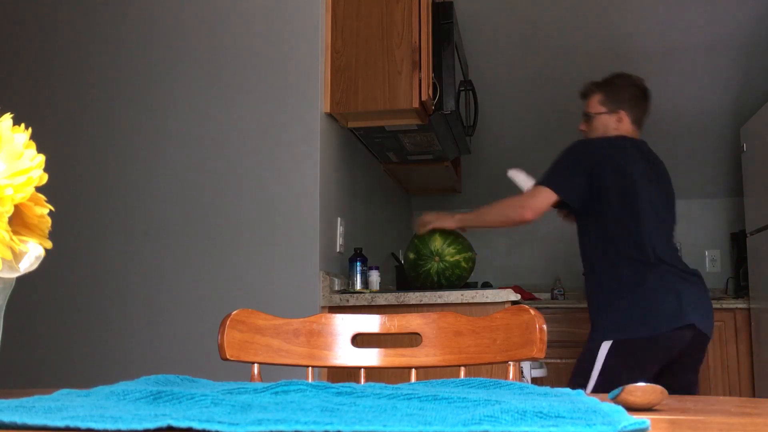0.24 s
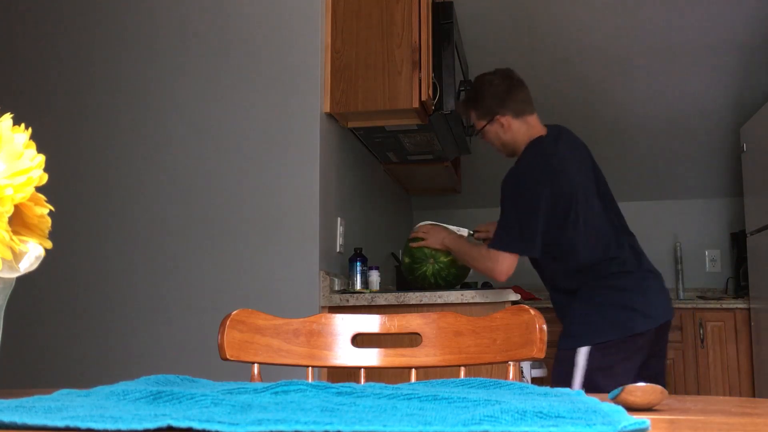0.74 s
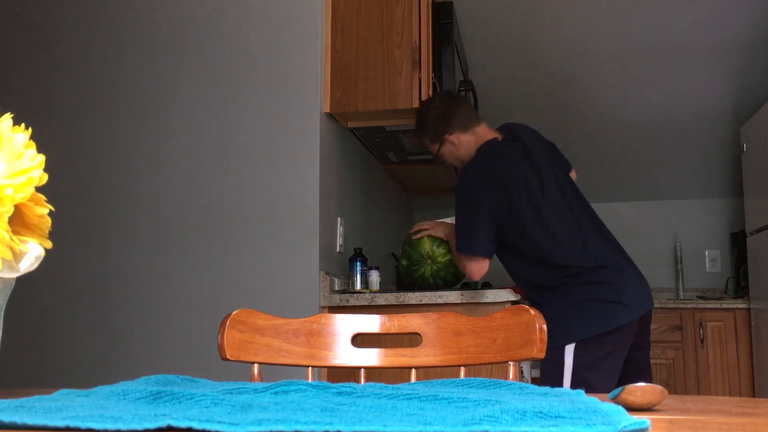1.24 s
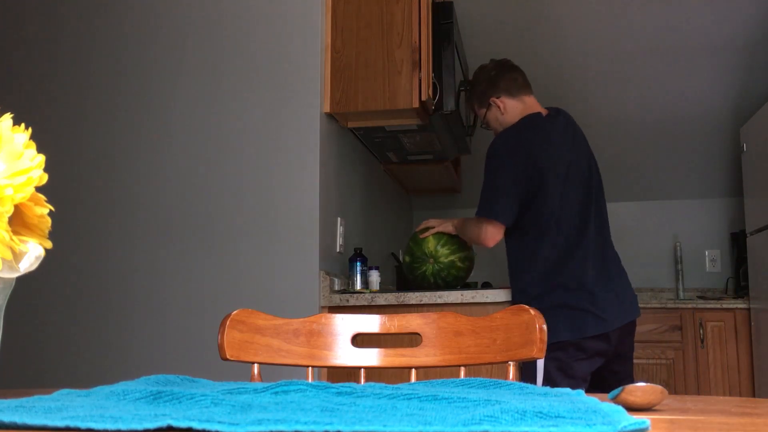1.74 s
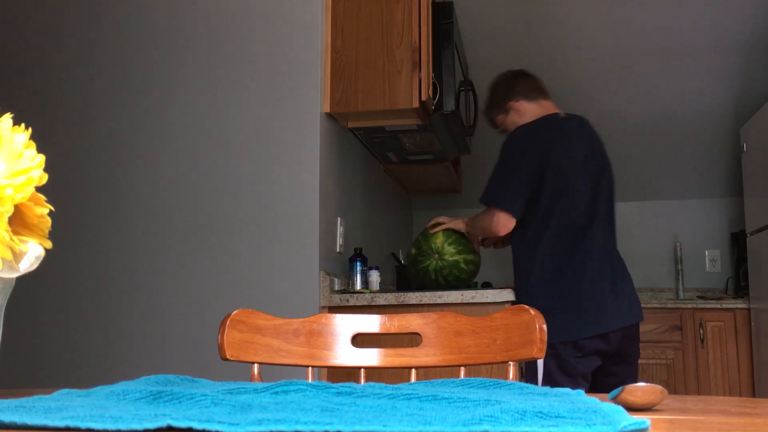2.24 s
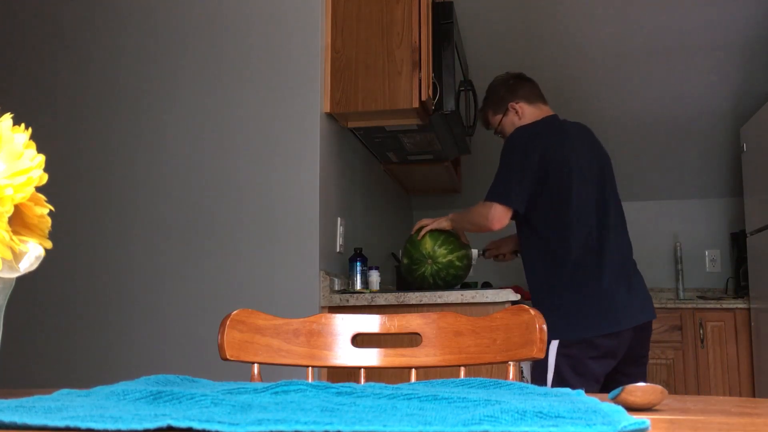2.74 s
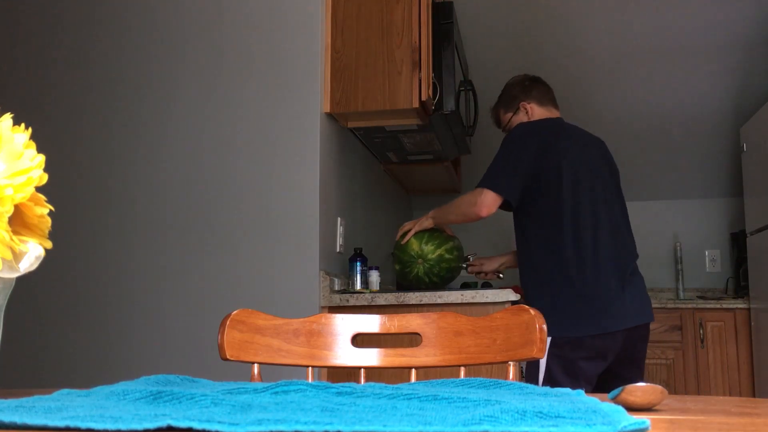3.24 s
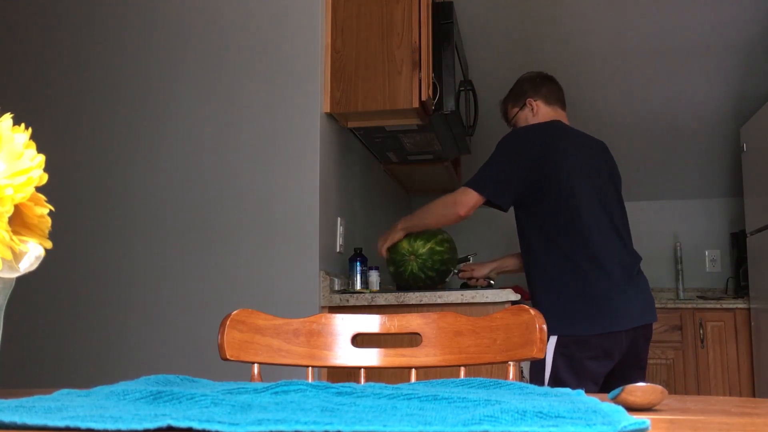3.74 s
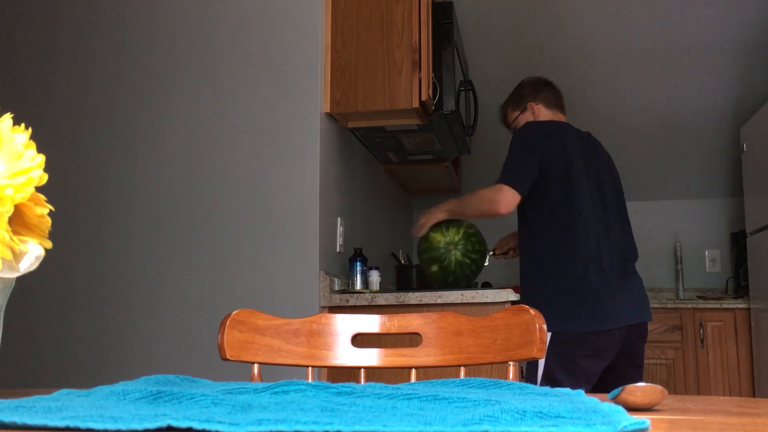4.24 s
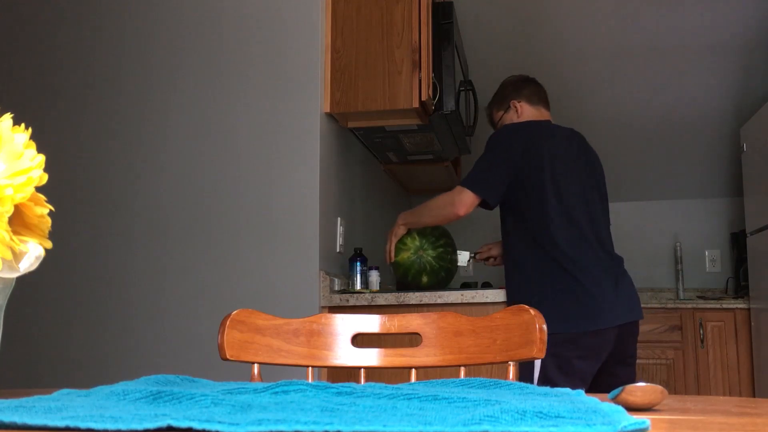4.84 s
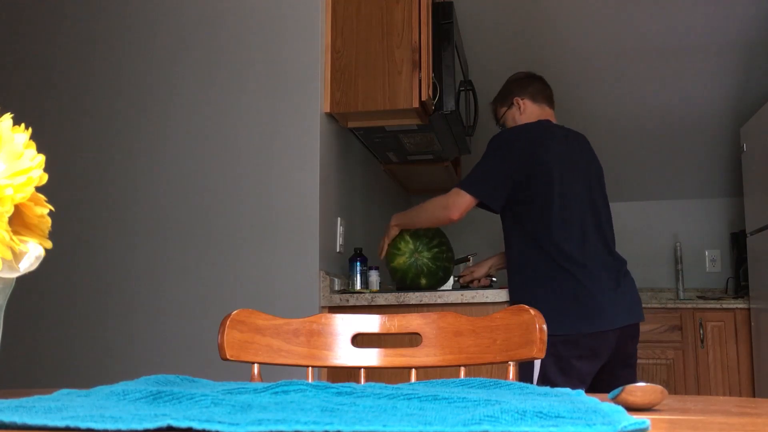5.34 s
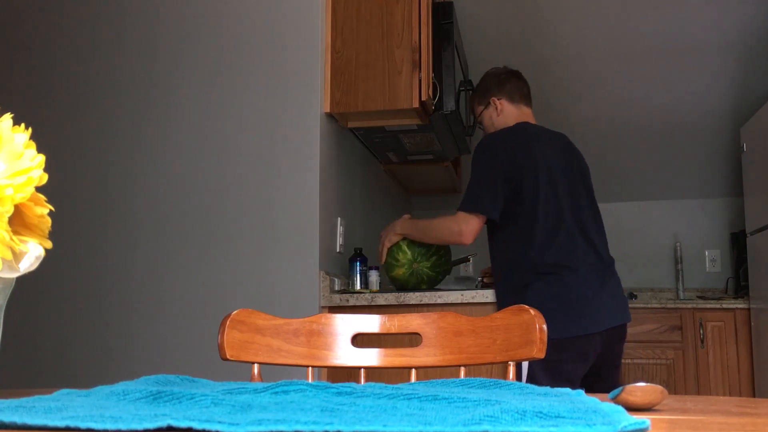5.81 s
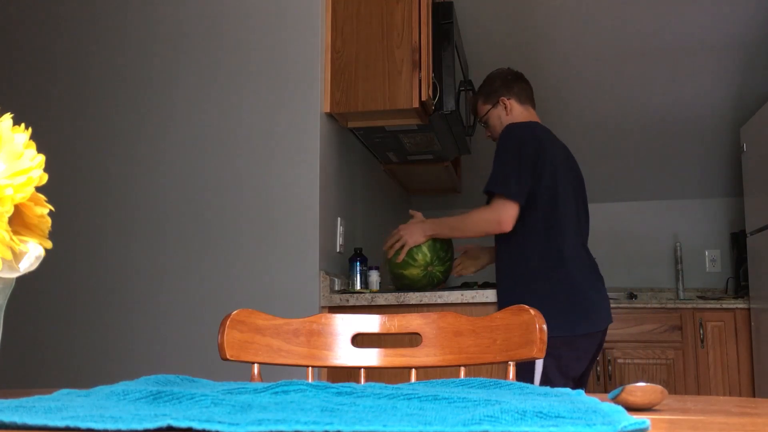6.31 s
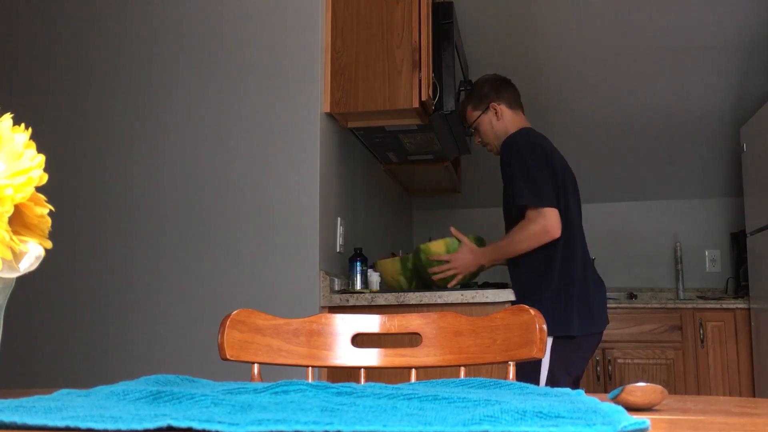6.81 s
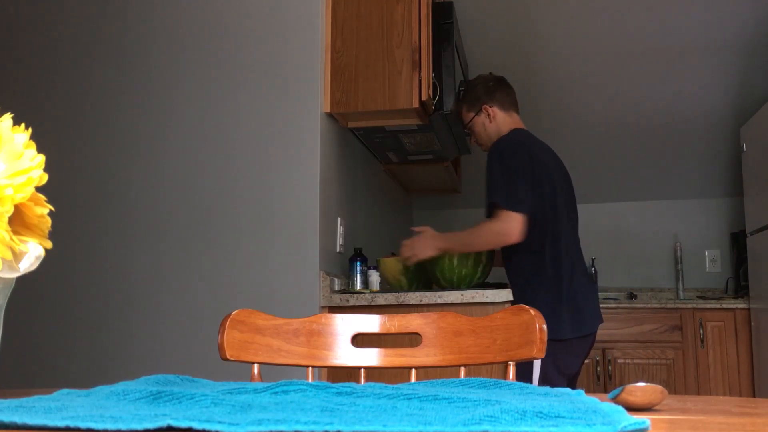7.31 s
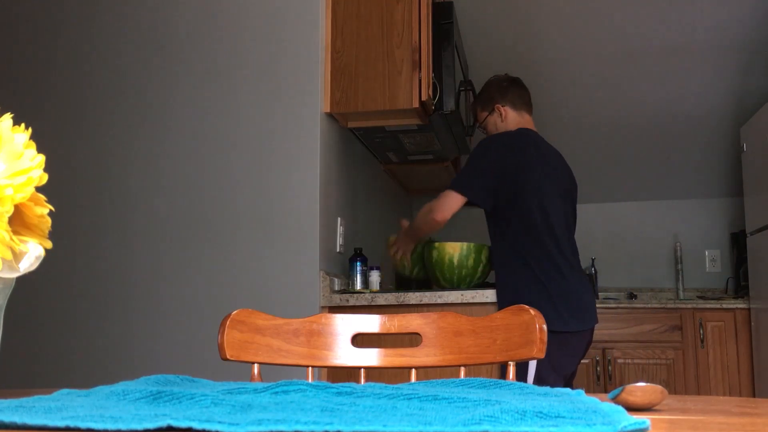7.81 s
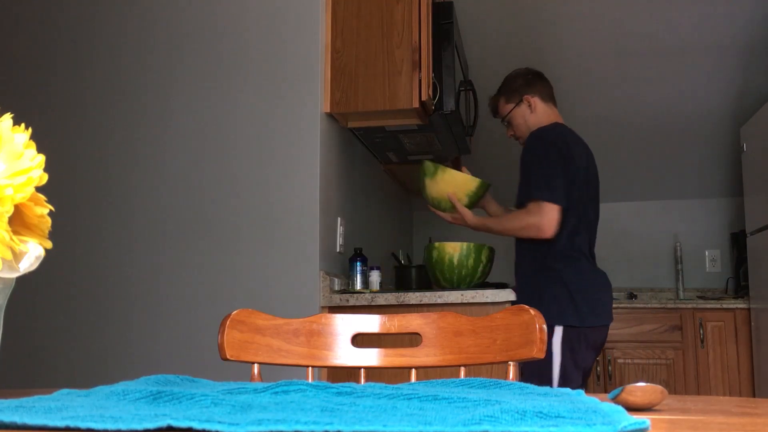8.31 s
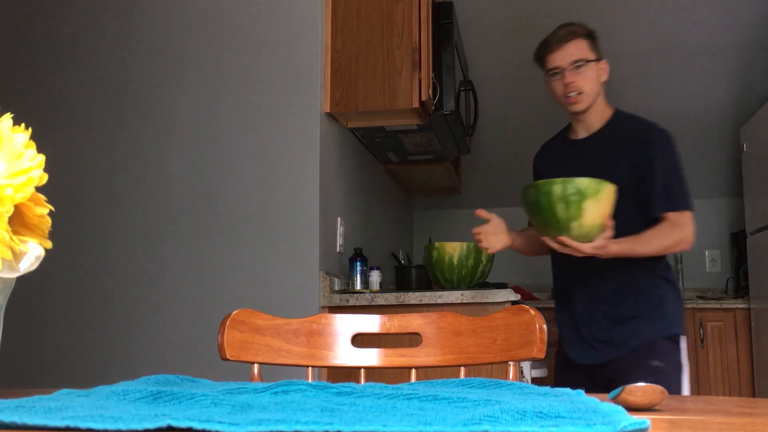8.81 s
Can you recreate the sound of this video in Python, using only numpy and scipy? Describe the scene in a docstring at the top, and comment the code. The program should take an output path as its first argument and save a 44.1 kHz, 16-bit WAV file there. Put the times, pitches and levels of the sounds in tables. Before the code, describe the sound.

Heard from across a bare, echoing kitchen, a watermelon takes a few hard knife chops that ring its hollow body. Soft rasping and fizzing follow as the blade works around the rind, with faint low thumps. Then the melon splits in a run of loud cracks, wet snapping fibres and a short steel ring. The halves are shifted and set down with scrapes and a knock, over a low, steady fridge hum.

```python
"""A watermelon scuffs on a board over a humming fridge; a big knife chops into it and saws round it.
The rind cracks and rings the hollow body, wet cells fizz, and the steel blade ticks and rings.
Snapping fibres tear the fruit open with a wet crunch, then the halves are set down on the counter.
The work is a few metres away and arrives mostly through the bare kitchen's echo."""
import sys
import numpy as np
from scipy import signal
from scipy.fft import rfft, irfft
from scipy.io import wavfile

SR = 44100
rng = np.random.default_rng(int(sys.argv[2]) if len(sys.argv) > 2 else 0)


def generate_wav(sig):
    """Save sig (samples, or channels by samples) to the path in sys.argv[1] as 16-bit PCM at SR."""
    pcm = np.round(np.clip(np.atleast_2d(sig).T, -1, 1) * 32767).astype(np.int16)
    wavfile.write(sys.argv[1], SR, pcm)


N = 399457
FILTER_HZ = np.maximum(np.fft.rfftfreq(4096, 1 / SR), 1)

# blows and single cracks: t/s, rind f/Hz, rind level/dB, hollow level/dB, brightness/dB
BLOWS = [(.064, 1000, 10, 8.5, 1), (.235, 890, 5.5, 8.5, 3.5), (.635, 1520, 9, 11.5, 2.5),
         (2.323, 880, -6, -2, -4.5), (5.210, 1295, 16, 9.5, -6), (5.643, 1255, 11.5, 7.5, -9),
         (5.671, 744, 16.5, 5, -15.5), (5.807, 1870, 14.5, 2.5, -4.5), (5.888, 674, 17, 13.5, -5),
         (6.036, 2280, 10.5, 5, 6), (6.735, 1420, -9, -1.5, -7.5), (7.784, 760, 4.5, 8, -25)]
# spectra of the hollow body, crisp cells and juice: f/Hz, gain/dB
HOLLOW_SPECTRUM = [(30, -19.5), (130, -0.5), (220, -7), (340, 0.5), (480, -5), (700, -0.5), (1100, -19.5),
                   (3000, -42), (16000, -79)]
CRISP_SPECTRUM = [(100, -66.5), (700, -48.5), (2200, 1), (2900, -3.5), (3600, -2), (5000, -7.5),
                  (6500, -10), (8000, -36), (16000, -40.5)]
JUICE_SPECTRUM = [(300, -65), (2000, -34), (6000, -0.5), (9300, 1), (10500, -7.5), (14000, -11.5),
                  (16000, -14)]


def undb(db):
    """Decibels to gain."""
    return 10 ** (np.asarray(db) / 20)


def unit_rms(x):
    """Scale to rms 1."""
    return x / np.sqrt(np.mean(x ** 2) + 1e-20)


def curve(points, hz=FILTER_HZ):
    """Interpolate (f/Hz, value) points over log frequency."""
    point_hz, values = np.transpose(points)
    return np.interp(np.log(np.maximum(hz, 1)), np.log(point_hz), values)


def resonance(hz, q):
    """Gain of a resonance with steep skirts."""
    return 1 / (1 + (q * (FILTER_HZ / hz - hz / FILTER_HZ)) ** 2)


def colour(x, gain):
    """Minimum-phase filter with this gain at FILTER_HZ."""
    cepstrum = irfft(np.log(gain + 1e-7))
    half = len(cepstrum) // 2
    cepstrum[1:half] *= 2
    cepstrum[half + 1:] = 0
    return signal.fftconvolve(x, irfft(np.exp(rfft(cepstrum))))


def add(track, start_s, x):
    """Mix x into the track."""
    start = int(start_s * SR)
    x = x[max(-start, 0):N - start]
    start = max(start, 0)
    track[start:start + len(x)] += x


def arch(length_s):
    """Half sine: a push that swells and lets go."""
    return np.sin(np.linspace(0, np.pi, max(int(length_s * SR), 16))).clip(0)


def wander(per_s):
    """Slow random curve, spread near 1."""
    knots = rng.standard_normal(int(N / SR * per_s) + 2)
    return np.interp(np.linspace(0, len(knots) - 1, N), np.arange(len(knots)), knots)


def snaps(n, per_s, spread_db):
    """Tiny snaps of random time and size over faint noise."""
    sizes = undb(spread_db * np.minimum(rng.exponential(size=n), 2.8))
    signs = rng.choice([-1, 1], n)
    fires = rng.random(n) < per_s / SR
    return unit_rms(sizes * signs * fires + 0.052 * rng.standard_normal(n))


def crunch(length_s):
    """Fibres give way in a quick run under a push."""
    force = np.sqrt(arch(length_s))
    return force * snaps(len(force), per_s=600, spread_db=4.5)


def melon(rind_hz, rind_db, hollow_db, crisp_db, juice_db):
    """Fruit response: power sum of stiff ringing rind, hollow body, crisp cells and juice."""
    rind = undb(rind_db) * (resonance(rind_hz, q=0.82) + resonance(rind_hz, q=9))
    hollow = undb(hollow_db + curve(HOLLOW_SPECTRUM))
    crisp = undb(crisp_db + curve(CRISP_SPECTRUM))
    juice = undb(juice_db + curve(JUICE_SPECTRUM))
    return np.linalg.norm([rind, hollow, crisp, juice], axis=0)


def drags(gain_db=1.33, low_cut_hz=160):
    """Rind catches and slips on the board or under the blade; light pushes sound mostly the body."""
    # fruit turned, pushed, set down or scraped by the knife:
    # t/s, length/s, rind f/Hz, rind level/dB, brightness/dB
    moves = [(-.06, 0.089, 1940, -22.5, -14), (0.101, 0.061, 1800, -21.5, -1), (0.305, 0.14, 990, -28.5, 1),
             (0.482, 0.04, 1520, -34.5, 2.5), (3.291, 0.037, 395, -34, -19), (5.214, 0.21, 850, -28.5, -1),
             (5.431, 0.21, 1210, -45.5, 0.5), (6.91, 0.042, 1020, -19.5, -10),
             (6.927, .075, 1130, -15, -15), (6.939, 0.072, 384, -30, -28), (6.962, 0.049, 1570, -18.5, -20),
             (7.134, 0.11, 1190, -40, -7), (7.256, 0.081, 1490, -33.5, -8), (7.446, .1, 1390, -31.5, -6)]
    out = np.zeros(N)
    low_cut = 1 / np.sqrt(1 + (low_cut_hz / FILTER_HZ) ** 4)
    for start_s, length_s, hz, db, bright_db in moves:
        fruit = melon(hz, db, hollow_db=0.49 * db - 10.5, crisp_db=db + bright_db,
                      juice_db=db - 15 + 0.5 * bright_db)
        add(out, start_s, colour(crunch(length_s), fruit * low_cut))
    return out * undb(gain_db)


def fridge(drone_hz=59.7, air_db=-55.5, waver_db=3.0, drift_hz=1.2):
    """Deep drone and wavering compressor tones in a soft rush of air."""
    air_spectrum = [(20, -32.5), (30, -10.5), (42, -2.5), (65, -16.5), (90, -14.5), (130, -14),
                    (220, -15.5), (330, -8.5), (430, -17), (552, -17.5), (970, -22.5), (2010, -31),
                    (2850, -36.5), (3300, -37), (15500, -48.5)]  # air and compressor noise: f/Hz, gain/dB
    drone_levels = [(0, -58), (1.5, -57), (4.2, -60.5), (4.7, -66.5), (5.2, -60), (7.2, -55.5),
                    (8.2, -59.5)]  # deep hum: t/s, rms level/dB
    tones = [(160, -69), (200, -76.5), (296, -67.5), (323, -70), (355, -67.5), (473.5, -66.5)]  # higher tones: f/Hz, rms level/dB
    t = np.arange(N) / SR
    air = unit_rms(colour(rng.standard_normal(N), undb(curve(air_spectrum)))[:N])
    hum = undb(np.interp(t, *np.transpose(drone_levels))) * np.sin(2 * np.pi * drone_hz * t)
    for hz, db in tones:
        level = undb(db + waver_db * wander(per_s=4.2))
        cycles = np.cumsum(hz + drift_hz * wander(per_s=6)) / SR
        hum += level * np.sin(2 * np.pi * cycles)
    return undb(air_db) * air + np.sqrt(2) * hum


def flatten(x):
    """Whiten a burst; its energy becomes 1."""
    spectrum = rfft(x)
    return irfft(spectrum / (np.abs(spectrum) + 1e-12), len(x))


def crack(contact_s):
    """White burst that dies away with the contact time."""
    fade = np.exp(-np.arange(2048) / SR / contact_s)
    burst = flatten(rng.standard_normal(len(fade)) * fade)
    return flatten(burst * np.sqrt(fade))


def chops(gain_db=2.7, crunch_db=-38.5, halving_db=17.5):
    """A crack and crushed fibres ring the fruit; brighter blows are shorter and juicier."""
    out = np.zeros(N)
    for start_s, hz, db, hollow_db, bright_db in BLOWS:
        fruit = melon(hz, db, hollow_db, crisp_db=db + bright_db, juice_db=db - 16 + 2.6 * bright_db)
        contact_s = 0.0042 * 2 ** (-bright_db / halving_db)
        add(out, start_s, colour(crack(contact_s), fruit))
        add(out, start_s, undb(crunch_db) * colour(crunch(length_s=0.036), fruit))
    return out * undb(gain_db)


def swing(length_s, hz):
    """A few cycles that swell and die."""
    push = arch(length_s) ** 2
    return push * np.sin(2 * np.pi * hz * np.arange(len(push)) / SR)


def thumps(cycles=5.5, thud_vs_hollow_db=-60.5):
    """Shifting weight swings counter and floor; the counter also thuds under each blow."""
    pushes = [(.342, 37.6, -38), (0.641, 157, -38), (1.361, 90, -41), (1.412, 121, -42.5), (1.453, 42, -45),
              (2.348, 68.4, -42.5), (2.535, 234, -40), (3.17, 42, -45.5), (3.233, 95, -45.5),
              (4.276, 138, -45), (5.589, 43.8, -37.5), (5.903, 41.6, -41), (6.93, 122, -42),
              (8.823, 38.4, -40)]  # weight shifts: t/s, f/Hz, peak level/dB
    out = np.zeros(N)
    for start_s, hz, db in pushes:
        add(out, start_s, undb(db) * swing(cycles / hz, hz))
    for start_s, _, _, hollow_db, _ in BLOWS:
        add(out, start_s, undb(hollow_db + thud_vs_hollow_db) * swing(length_s=0.11, hz=117.5))
    return out


def edge_ticks():
    """The steel edge clicks, very short and thin."""
    ticks = [(0.637, 13200, -4), (2.3235, 13000, -17), (3.2147, 14000, -8)]  # edge contacts: t/s, f/Hz, level/dB
    out = np.zeros(N)
    for start_s, hz, db in ticks:
        add(out, start_s, colour(crack(contact_s=0.0005), undb(db) * resonance(hz, q=2)))
    return out


def fizz(length_s):
    """Wet cells burst, loudest at mid-stroke."""
    speed = arch(length_s)
    return speed * snaps(len(speed), per_s=2500, spread_db=4)


def sawing(gain_db=2.7, squeak_db=-7, hollow_db=-8, return_gap_s=0.078, return_cap_db=-57.5):
    """Each stroke rubs the rind at one pitch while wet cells fizz; the return only fizzes, faintly."""
    # blade or hands sliding on the fruit: t/s, length/s, rub f/Hz, rub level/dB, hiss level/dB
    strokes = [(1.17, 0.31, 1820, -48.5, -59), (1.335, .049, 1350, -35, -40.5),
               (1.863, 0.034, 1840, -36.5, -51.5), (2.301, 0.048, 1610, -34, -47.5),
               (2.459, 0.083, 250, -32, -74), (2.653, 0.11, 1440, -36.5, -45),
               (2.962, 0.35, 1290, -41, -51.5), (3.283, 0.057, 990, -33.5, -51.5),
               (3.576, 0.17, 1380, -39, -52), (4.013, .18, 820, -36, -57), (4.222, 0.038, 1620, -39, -53),
               (4.474, .135, 1330, -34, -47), (4.94, 0.46, 1540, -31.5, -46),
               (5.25, 0.16, 1304, -33, -33.5), (8.2, 0.053, 2720, -52, -71),
               (8.789, 0.18, 1920, -56, -62.5)]
    hiss_spectrum = [(60, -53), (400, -3), (1500, 1), (3500, 2.5), (4700, -1), (6300, -1), (8000, -4),
                     (9300, 0), (10300, -7.5), (12500, -4.5), (16000, -17)]  # bursting cells: f/Hz, gain/dB
    out = np.zeros(N)
    treble_lift_db = 0.5 * np.clip((FILTER_HZ - 6000) / 8000, 0, 1)
    wet = undb(curve(hiss_spectrum) + treble_lift_db)
    hollow = undb(hollow_db + curve(HOLLOW_SPECTRUM))
    for start_s, length_s, hz, rub_db, hiss_db in strokes:
        speed = arch(length_s)
        rub = speed * snaps(len(speed), per_s=1100, spread_db=3.5)
        rind = 0.61 * resonance(hz, q=1.1) + undb(squeak_db) * resonance(hz, q=6.9)
        add(out, start_s, colour(rub, undb(rub_db) * (rind + hollow)))
        add(out, start_s, undb(hiss_db) * colour(fizz(length_s), wet))
        return_db = min(hiss_db - 10, return_cap_db)
        add(out, start_s + length_s + return_gap_s, undb(return_db) * colour(fizz(length_s=0.12), wet))
    return out * undb(gain_db)


def blade_ring(favour_db=8, favour_width_hz=220):
    """Scrapes and jolts ring the blade; the contact point favours some modes."""
    modes = [(3315, -6, .2), (3380, -2, .15), (3515, 0, .14), (3736, -5, .14), (3880, -7, .14),
             (4350, -12, .2), (5060, -12, .2), (5340, -9, .15), (5440, -9, .15), (6950, -14, .15),
             (7920, -13, .18), (9360, -11, .18), (9675, -12, .18)]  # steel blade: f/Hz, level/dB, t60/s
    touches = [(5.65, .12, 5400, -49), (5.88, .08, 3380, -25.5), (6.029, .04, 3600, -21),
               (6.1, .06, 3600, -38), (7.255, .03, 5400, -52), (7.31, .05, 5400, -50.5),
               (7.47, .06, 5400, -52)]  # blade contacts: t/s, length/s, favoured f/Hz, level/dB
    out = np.zeros(N)
    t = np.arange(SR // 2) / SR
    for start_s, length_s, favoured_hz, db in touches:
        force = arch(length_s)
        scrape = force * snaps(len(force), per_s=920, spread_db=-4.5)
        for hz, mode_db, t60_s in modes:
            mode = np.sin(2 * np.pi * hz * t) * undb(-60 * t / t60_s)
            ring = signal.fftconvolve(scrape, mode)
            lift_db = favour_db * np.exp(-((hz - favoured_hz) / favour_width_hz) ** 2)
            add(out, start_s, undb(db + mode_db + lift_db) * ring / np.abs(ring).max())
    return out


def tear(gain_db=0.5, hollow_db=-5, dry_db=-17, wet_db=-10, juicy_from_s=5.875, juicy_to_s=6.15):
    """Snapping fibres ring rind, body and cells; the juicy middle sprays most."""
    effort = [(5.69, -24, 2), (5.76, -16.5, -0.5), (5.8, -18, -18), (5.86, -12, -0.5), (5.885, -10, 2),
              (5.96, -14.5, -0.5), (6.02, -18, -0.5), (6.06, -18, 6), (6.15, -12, -0.5), (6.2, -27.5, -1.5),
              (6.472, -32.5, -3.5)]  # fruit forced apart: t/s, force/dB, brightness/dB
    t = np.arange(N) / SR
    at_s, force_db, bright_db = np.transpose(effort)
    force = undb(np.interp(t, at_s, force_db)) * (t > at_s[0]) * (t < at_s[-1])
    fibres = force * snaps(N, per_s=600, spread_db=4.5)
    cells = fibres * undb(np.interp(t, at_s, bright_db))
    juicy = (t > juicy_from_s) & (t < juicy_to_s)
    spray = cells * undb(np.where(juicy, wet_db, dry_db))
    body = np.hypot(resonance(hz=1100, q=1), undb(hollow_db + curve(HOLLOW_SPECTRUM)))
    out = colour(fibres, body)
    out += colour(cells, undb(curve(CRISP_SPECTRUM)))
    out += colour(spray, undb(curve(JUICE_SPECTRUM)))
    return out[:N] * undb(gain_db)


def reflections(build_s=0.002):
    """Dense echoes with equal energy per Hz; the treble dies first."""
    decay_times = [(100, .6), (250, .72), (1000, .62), (4000, .6), (7000, .54), (10000, .42), (14000, .31)]  # kitchen echo: f/Hz, t60/s
    t = np.arange(SR) / SR
    hz = np.fft.rfftfreq(SR, 1 / SR)
    spectrum = rfft(snaps(SR, per_s=7000, spread_db=3.5))
    onset = 1 - np.exp(-t / build_s)
    edges_hz = np.r_[0, np.geomspace(100, SR / 2, 32)]
    tail = np.zeros(SR)
    for low_hz, high_hz in zip(edges_hz, edges_hz[1:]):
        t60_s = curve(decay_times, (low_hz + high_hz) / 2)
        band = irfft(spectrum * (hz >= low_hz) * (hz < high_hz), SR)
        band *= onset * undb(-60 * t / t60_s)
        tail += band / np.linalg.norm(band) * np.sqrt(2 * (high_hz - low_hz) / SR)
    return tail


def kitchen(x, direct_db=-9, echo_db=-0.83, trim_db=-1.8, shade_hz=6500):
    """Weak direct path, shaded by the cook's body; echoes shift as cook and fruit move."""
    nook_modes = [(337.7, 12, 6), (363, 91, 2), (554, 70, -1.5), (637.6, 8.5, 4.5), (754, 31, -2.5),
                  (859, 20, 5.5), (1010, 25, 2), (1380, 88, 2.5), (1620, 52, 4), (1820, 50, 5),
                  (2850, 480, -3.5)]  # counter nook under the cupboard: f/Hz, width/Hz, gain/dB
    nook_db = sum(db / (1 + (2 * (FILTER_HZ - hz) / width_hz) ** 2) for hz, width_hz, db in nook_modes)
    x = colour(x, undb(nook_db + trim_db))[:N]
    shares = np.array([wander(per_s=2.5) for _ in range(3)])
    shares /= np.linalg.norm(shares, axis=0)  # constant-power blend of three echo patterns
    echo = sum(signal.oaconvolve(x * share, reflections())[:N] for share in shares)
    direct = colour(x, 1 / np.sqrt(1 + (FILTER_HZ / shade_hz) ** 2))[:N]
    return undb(direct_db) * direct + undb(echo_db) * echo


def scene(tick_beam_db=-7):
    """Work at the counter, heard across the kitchen; both channels alike."""
    ticks = edge_ticks()
    room = kitchen(chops() + drags() + tear() + sawing() + blade_ring() + ticks)
    beamed = undb(tick_beam_db) * ticks  # the flat blade beams its ticks straight across the room
    mono = room + beamed + thumps() + fridge()
    return np.array([mono, mono])


def record(dry, low_hz=22, top_hz=15800):
    """Drop the deepest rumble and cut the top steeply."""
    high_pass = signal.butter(2, low_hz, "high", fs=SR, output="sos")
    low_pass = signal.ellip(10, 0.2, 70, top_hz, fs=SR, output="sos")
    return signal.sosfilt(low_pass, signal.sosfilt(high_pass, dry))


dry = scene()
out = record(dry)
generate_wav(out)
```